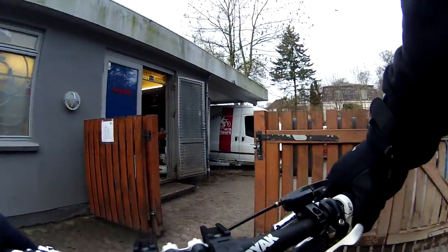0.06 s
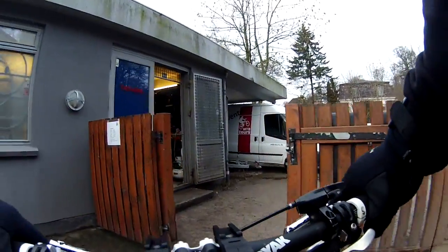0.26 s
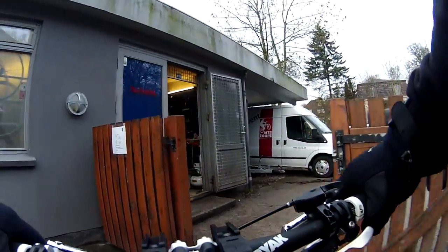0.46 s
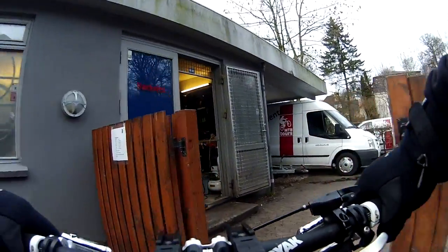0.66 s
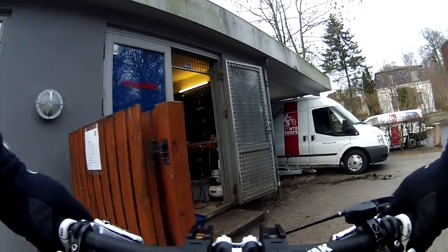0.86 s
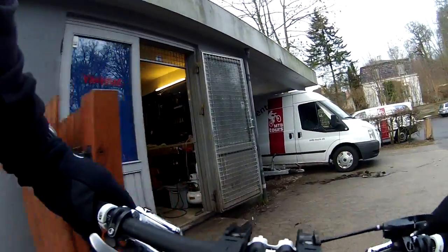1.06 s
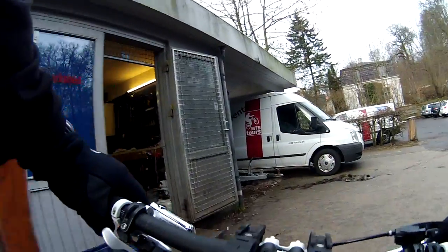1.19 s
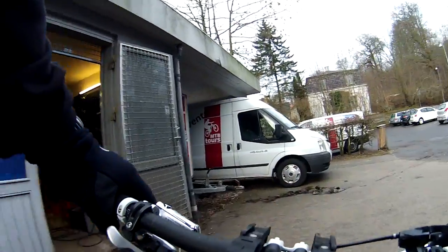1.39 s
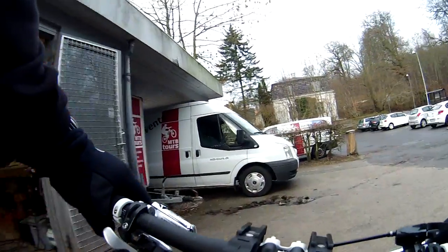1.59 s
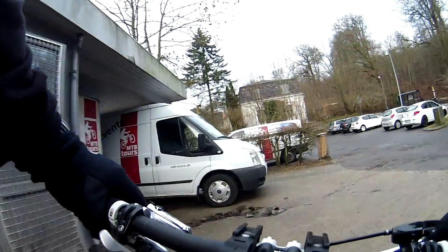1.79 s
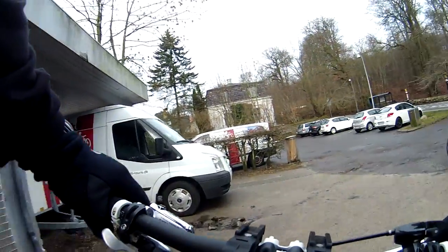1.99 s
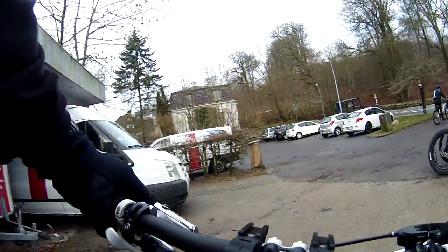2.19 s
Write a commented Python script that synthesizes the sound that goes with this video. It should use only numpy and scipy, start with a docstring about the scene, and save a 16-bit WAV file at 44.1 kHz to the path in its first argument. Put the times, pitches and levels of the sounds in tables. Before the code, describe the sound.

A mountain bike coasts over gritty paving with a low rumble and one hard, sharp knock early on

```python
"""A mountain bike coasts over paving: its knobbly tyres shake the fork and frame into a low rumble, made
from two wavering tones and filtered noise. Grit hisses and crunches as noise bursts and tiny ringing grains.
One hard knock on the body-worn camera is a run of thumps and cracks; it overloads the microphone and
ducks the gain. Freehub clicks, thin ticks and a squeak are short and bright; faint noise and a whine lie below."""
import sys
import numpy as np
from scipy import signal
from scipy.fft import rfft, irfft, next_fast_len
from scipy.io import wavfile
from scipy.ndimage import uniform_filter1d, minimum_filter1d, map_coordinates

SR = 44100
rng = np.random.default_rng(int(sys.argv[2]) if len(sys.argv) > 2 else 0)


def materialize(psi):
    """Save the field psi as 16-bit PCM at rate SR to the path in sys.argv[1].

    A 1-D psi becomes a single channel; in a 2-D psi each row is a channel.
    """
    bounded = np.clip(np.atleast_2d(psi).T, -1, 1)
    quanta = np.round(bounded * 32767).astype(np.int16)
    wavfile.write(sys.argv[1], SR, quanta)


def decibels_to_gain(level_db):
    """Convert a level in decibels to a linear amplitude gain (20 dB per decade)."""
    exponent = np.asarray(level_db, float) / 20
    return 10 ** exponent


N = 99225


def unit(x):
    """Scales x to an rms of 1."""
    return x / np.sqrt(np.mean(x ** 2) + 1e-20)


def curves(rows):
    """Joins the table rows by straight lines: one curve for each column after the time."""
    times, *columns = np.transpose(rows)
    return [np.interp(np.arange(N) / SR, times, column) for column in columns]


def wobble(rate):
    """A smooth random curve with rate random points a second."""
    points = rng.standard_normal(int(N * rate / SR) + 4)
    return map_coordinates(points, [np.arange(N) * rate / SR])


def noise(count):
    """Plain white noise, count samples long."""
    return rng.standard_normal(count)


def coloured(x, points):
    """Filters x to the tone colour given by (f/Hz, level/dB) points; silent outside them."""
    size = next_fast_len(x.shape[-1] + 8192)
    f, db = np.transpose(points)
    log_hz = np.log(np.fft.rfftfreq(size, 1 / SR) + 1)
    gain = decibels_to_gain(np.interp(log_hz, np.log(f), db, left=-120, right=-120))
    return irfft(rfft(x, size) * gain, size)[..., :x.shape[-1]]


def ring(modes, t, scatter_db):
    """A struck object: sines that die away, each with a slightly random level."""
    out = np.zeros(len(t))
    for hz, db, t60 in modes:
        level_db = db + scatter_db * rng.standard_normal()
        out += decibels_to_gain(level_db - 60 * t / t60) * np.sin(2 * np.pi * hz * t)
    return out


def tone(hz):
    """A sine of rms 1 that follows a pitch curve."""
    return np.sqrt(2) * np.sin(2 * np.pi * np.cumsum(hz) / SR)


def add(out, s, x):
    """Mixes x into out from s seconds on."""
    part = out[round(s * SR):][:len(x)]
    part += x[:len(part)]


# the fork bouncing on the road: (t/s, level/dB)
FORK_BOUNCE = [(0, -36), (.76, -33), (.92, -43.5), (1.07, -35), (1.12, -38), (1.37, -30.5), (1.52, -54),
               (1.67, -30), (1.76, -46), (1.84, -32), (2.1, -46)]
# level of a low hum near 147 Hz that waxes and wanes by chance: (t/s, level/dB)
LOW_HUM = [(.12, -44), (.17, -51), (.59, -47.5), (.74, -32.5), (.78, -50.5), (.88, -31), (.91, -57),
           (1.09, -31), (1.12, -59), (1.16, -31.5), (1.3, -46.5), (1.36, -31.5), (1.5, -34), (1.57, -55),
           (1.69, -32), (1.745, -50), (1.8, -31.5), (1.91, -36), (2.02, -39), (2.12, -31.5), (2.18, -49.5)]
# tyre contact, also used by grit(): (t/s, tread rumble level/dB, grit hiss level/dB)
TYRE_CONTACT = [(0, -33.5, -47.5), (.2, -38.5, -51), (.8, -38, -48.5), (.97, -36, -46), (1.17, -33.5, -48),
                (1.35, -35.5, -49.5), (1.65, -34.5, -53.5), (1.85, -34.5, -50), (2.25, -34, -50)]
# tone colour of the tread rumble, also used by knock(): (f/Hz, relative level/dB)
TREAD_COLOUR = [(40, -1), (55, -11.5), (86, -20.5), (115, -20), (150, -6.5), (226, -10.5), (400, -12),
                (480, -25), (620, -35)]
BOUNCE_HZ, BOUNCE_WANDER_HZ = 29.2, 2.66
HUM_HZ, HUM_WANDER_HZ, HUM_ROUGH_DB = 147.4, 6.46, 3.5


def frame():
    """Fork bounce and a low hum waver in pitch; the tread fills in a lumpy rumble."""
    bounce_db, = curves(FORK_BOUNCE)
    hum_db, = curves(LOW_HUM)
    tread_db = curves(TYRE_CONTACT)[0]
    bounce = tone(BOUNCE_HZ + BOUNCE_WANDER_HZ * wobble(5.4))
    hum_roughness = decibels_to_gain(HUM_ROUGH_DB * wobble(25.38))
    hum = unit(hum_roughness * tone(HUM_HZ + HUM_WANDER_HZ * wobble(18)))
    tread = unit(decibels_to_gain(0.72 * wobble(21.92)) * coloured(noise(N), TREAD_COLOUR))
    return decibels_to_gain(bounce_db) * bounce + decibels_to_gain(hum_db) * hum + decibels_to_gain(tread_db) * tread


# tone colour of hiss and stone grains: (f/Hz, relative level/dB)
HISS_COLOUR = [(450, -6.5), (650, -2), (1960, -5), (3460, -12.5), (5300, -15.5), (7000, -31),
               (10000, -38.5)]
STONES_PER_S, STONE_HZ = 460, 2180  # average count, middle pitch
STONES_DB, STONE_SPREAD_DB = -5, 2.5  # grains against hiss, unevenness of the grains


def grit():
    """Rolling hiss with short ringing stone grains scattered on it."""
    level_db = curves(TYRE_CONTACT)[1]
    hiss = unit(decibels_to_gain(1.76 * wobble(39.56)) * coloured(noise(N), HISS_COLOUR))
    # one row per grain: random place, pitch and loudness
    place, pitch, loudness = np.split(rng.random((int(STONES_PER_S * N / SR), 3)), 3, axis=1)
    hz = STONE_HZ * np.exp(1.44 * (pitch - .5) * 2)
    k = np.arange(128)
    grain = np.exp(-hz * k / SR / 0.64) * np.sin(2 * np.pi * hz * k / SR)
    grain = decibels_to_gain(-STONE_SPREAD_DB * np.log(loudness + 0.0018)) * grain  # a few stand out
    at = (place * N).astype(int) + k
    grains = np.bincount(at.ravel(), grain.ravel(), N + 128)[:N]
    stones = unit(coloured(grains, HISS_COLOUR))
    return decibels_to_gain(level_db) * (hiss + decibels_to_gain(STONES_DB) * stones)


SCRAPE_S, SCRAPE_HALF_S, SCRAPE_DB = 1, 0.15, -47.5  # centre, time from centre to 1/e, level there


def scrape():
    """A patch of coarse grit swells under the tyre with a dull, rough scrape."""
    t = np.arange(N) / SR
    dull = coloured(noise(N), [(750, -6.5), (2600, -17.5)])
    rough = unit(decibels_to_gain(3.0 * wobble(89.8)) * dull)
    swell = np.exp(-((t - SCRAPE_S) / SCRAPE_HALF_S) ** 2)
    return decibels_to_gain(SCRAPE_DB) * swell * rough


# small stones crunching under the tyre: (t/s, level/dB, time to fall 20 dB/s, pitch f/Hz)
STONE_CRUNCHES = [(0.092, -40.5, 0.051, 1800), (0.3586, -34, 0.007, 2220), (0.794, -35, 0.013, 1650),
                  (0.9277, -37.5, 0.015, 1240), (0.9488, -38, 0.045, 1630), (1.1139, -31.5, 0.0083, 1680),
                  (1.123, -34, 0.015, 990), (1.1936, -39, 0.024, 1580), (1.716, -40.5, 0.012, 1890),
                  (1.806, -37.5, 0.0089, 1840), (1.7659, -43, 0.0077, 1590), (2.169, -46, 0.0056, 3630)]
# tone colour of a crunch: (f as a multiple of the pitch, relative level/dB)
CRUNCH_TONE = [(.6, -12), (1, 4), (2.4, -11), (4, -24)]


def crunches():
    """Bursts of crackling noise with a fast rise and a steady dying away."""
    out, t = np.zeros(N), np.arange(4410) / SR
    for s, db, length, hz in STONE_CRUNCHES:
        # the loudness jumps every 40 samples
        jumps_db = 2.35 * noise(len(t) // 40 + 1).repeat(40)[:len(t)]
        crackle = noise(len(t)) * decibels_to_gain(jumps_db)
        crunch = unit(coloured(crackle, np.multiply(CRUNCH_TONE, [hz, 1])))
        envelope = (1 - np.exp(-t / 0.0011)) * decibels_to_gain(-20 * t / length)
        add(out, s, decibels_to_gain(db) * crunch * envelope)
    return out


# contacts of the knock: (t/s, signed push, crack level/dB, crack pitch f/Hz)
KNOCK_CONTACTS = [(0.2348, .75, -28, 2500), (.2369, -1.9, -13, 2500), (.2388, .55, -11, 4700),
                  (0.2408, -.6, -13, 3200), (0.2434, .4, -14, 5300), (.2655, .02, -35, 4000)]
# ringing of the camera housing: (f/Hz, level/dB, time to fall 60 dB/s)
HOUSING_MODES = [(276.4, 4, 0.016), (153.7, -15, 0.22), (246, -40, 0.17), (326, -9, 0.045),
                 (463, -11.5, 0.072), (719, -13.5, 0.031)]
# tone colour of a crack: (f as a multiple of the pitch, relative level/dB)
CRACK_TONE = [(.3, -20), (.65, -3), (1.1, 0), (1.5, -13), (3.2, -45)]
CRACK_T60_S, THUMP_RISE_S = 0.0083, .0015
RATTLE_DB, RATTLE_T60_S = -32, 0.19  # level against the crack
THUD_DB, THUD_T60_S = -14, 0.24
KNOCK_LOW_HZ = 146  # the knock is thinned out below this


def knock():
    """Contacts thump the camera housing, each with a bright crack that rattles out; the frame thuds after."""
    out, t = np.zeros(N), np.arange(SR // 4) / SR
    for s, push, crack_db, hz in KNOCK_CONTACTS:
        fade = decibels_to_gain(-60 * t / CRACK_T60_S) + decibels_to_gain(RATTLE_DB - 60 * t / RATTLE_T60_S)
        crack = unit(coloured(noise(len(t)), np.multiply(CRACK_TONE, [hz, 1])))
        crack = decibels_to_gain(crack_db) * crack * fade * (1 - np.exp(-t / 0.00013))
        thump = push * (1 - np.exp(-t / THUMP_RISE_S)) * ring(HOUSING_MODES, t, scatter_db=0.5)
        add(out, s, thump + crack)
    thud = unit(coloured(noise(len(t)), TREAD_COLOUR))
    add(out, KNOCK_CONTACTS[-2][0], decibels_to_gain(THUD_DB - 60 * t / THUD_T60_S) * thud)
    return signal.sosfilt(signal.butter(2, KNOCK_LOW_HZ, "high", fs=SR, output="sos"), out)


# every fifth click of the freehub pawls, as the wheel speeds up: (t/s, level/dB)
EVERY_FIFTH_CLICK = [(.085, -50), (.318, -48), (.551, -48), (.7837, -48), (1.0207, -46), (1.2457, -49),
                     (1.4612, -43.5), (1.6712, -48), (1.8832, -46), (2.0957, -41), (2.302, -43)]
# ringing of the hub shell: (f/Hz, relative level/dB, time to fall 60 dB/s)
HUB_MODES = [(3830, 0, .016), (4150, -4, .012), (3520, -4, .012)]
CLICK_SCATTER_DB = 1


def freehub():
    """Each pawl click rings the hub shell briefly."""
    out, t = np.zeros(N), np.arange(1500) / SR
    times, levels_db = np.transpose(EVERY_FIFTH_CLICK)
    row = np.arange(len(times))
    click = np.arange(5 * len(times) - 5) / 5  # four more clicks between each two rows
    for s, db in zip(np.interp(click, row, times), np.interp(click, row, levels_db)):
        level = decibels_to_gain(db + CLICK_SCATTER_DB * rng.standard_normal())
        rise = 1 - np.exp(-t / 0.00036)
        add(out, s, level * rise * ring(HUB_MODES, t, scatter_db=CLICK_SCATTER_DB))
    return out


# thin bright ticks: (t/s, level/dB, lowest f/Hz, highest f/Hz)
BRIGHT_TICKS = [(0.647, -53, 7060, 15000), (1.706, -58, 4800, 8500)]
SQUEAK_S, SQUEAK_HZ, SQUEAK_DB, SQUEAK_T60_S = 1.976, 5900, -51.5, .1


def bright_bits():
    """Two ticks of fading noise and a squeak, a sine that slides up quickly and then wavers."""
    out, t = np.zeros(N), np.arange(4410) / SR
    for s, db, low_hz, high_hz in BRIGHT_TICKS:
        tick = unit(coloured(noise(len(t)), [(low_hz, 0), (high_hz, 0)]))
        add(out, s, tick * decibels_to_gain(db - 60 * t / 0.013))
    hz = SQUEAK_HZ * (1 - 0.075 * np.exp(-t / 0.0039)) + 70 * wobble(370)[:len(t)]
    envelope = decibels_to_gain(SQUEAK_DB - 60 * t / SQUEAK_T60_S) * (1 - np.exp(-t / 0.0017))
    add(out, SQUEAK_S, envelope * np.sin(2 * np.pi * np.cumsum(hz) / SR))
    return out


def scene():
    """One microphone hears it all and feeds both channels."""
    mid = frame() + grit() + scrape() + crunches() + knock() + freehub() + bright_bits()
    return np.array([mid, mid])


# tone colour of the preamp noise: (f/Hz, relative level/dB)
PREAMP_COLOUR = [(200, -17.5), (15500, -11)]
SHARED_NOISE_DB, OWN_NOISE_DB = -73, -72  # same in both channels, separate in each
WHINE_HZ, WHINE_DB = 10519, -82


def preamp_noise():
    """Steady preamp noise, part shared by the channels and part separate, with a faint high whine."""
    shared, *own = unit(coloured(rng.standard_normal((3, N)), PREAMP_COLOUR))
    whine = np.sin(2 * np.pi * WHINE_HZ * np.arange(N) / SR)
    return decibels_to_gain(SHARED_NOISE_DB) * shared + decibels_to_gain(OWN_NOISE_DB) * np.array(own) + decibels_to_gain(WHINE_DB) * whine


THRESHOLD_DB, SLOPE = -8, 0.81  # SLOPE: dB of ducking per dB above the threshold
ATTACK_S, HOLD_S, RELEASE_DB_PER_S = 0.011, 0.21, 26.5
DUCK_JITTER_DB = .35  # while ducked the two channel gains jitter apart


def gain_control(x):
    """Turns the level down after peaks, holds it there, then lets it recover at a steady rate."""
    t = np.arange(N) / SR
    peak_db = 20 * np.log10(np.abs(x[0]) + 1e-9)
    need_db = -SLOPE * np.maximum(peak_db - THRESHOLD_DB, 0)
    hold, attack = int(HOLD_S * SR) | 1, int(ATTACK_S * SR) | 1
    # the origins make both windows look back in time only
    held_db = minimum_filter1d(need_db, hold, origin=hold // 2)
    recovery_db = RELEASE_DB_PER_S * t
    gain_db = np.minimum.accumulate(held_db - recovery_db) + recovery_db
    gain_db = uniform_filter1d(np.minimum(gain_db, 0), attack, origin=attack // 2)
    apart_db = DUCK_JITTER_DB * wobble(120) * np.clip(-gain_db, 0, 1)
    return x * decibels_to_gain(np.array([gain_db + apart_db, gain_db - apart_db]))


def roll_off(x):
    """The treble ends steeply here."""
    return signal.sosfilt(signal.butter(12, 15470, fs=SR, output="sos"), x)


def record(dry):
    """The preamp adds its noise, the gain control ducks, and whatever is still too loud is cut off flat."""
    ducked = gain_control(dry + preamp_noise())
    clipped = np.clip(ducked, -1, 1)
    return roll_off(clipped)


dry = scene()
out = record(dry)
materialize(out)
```